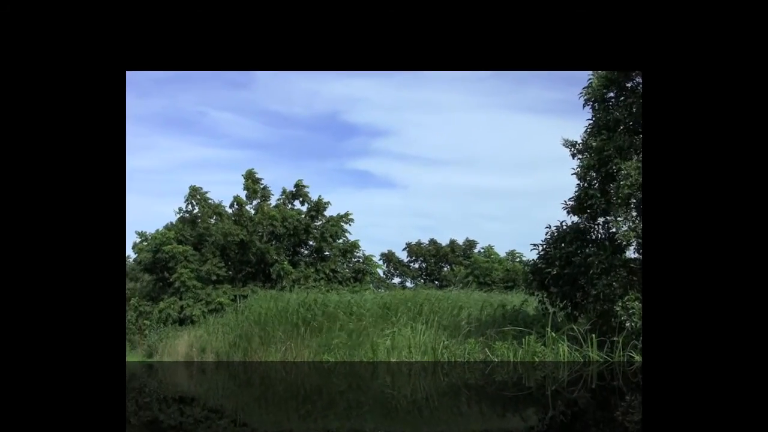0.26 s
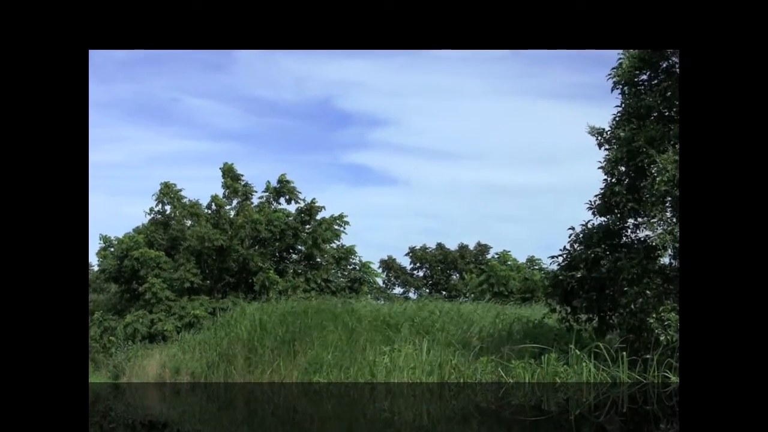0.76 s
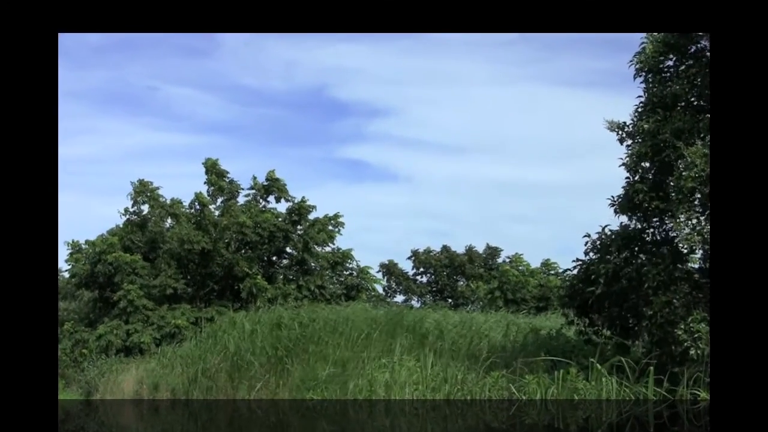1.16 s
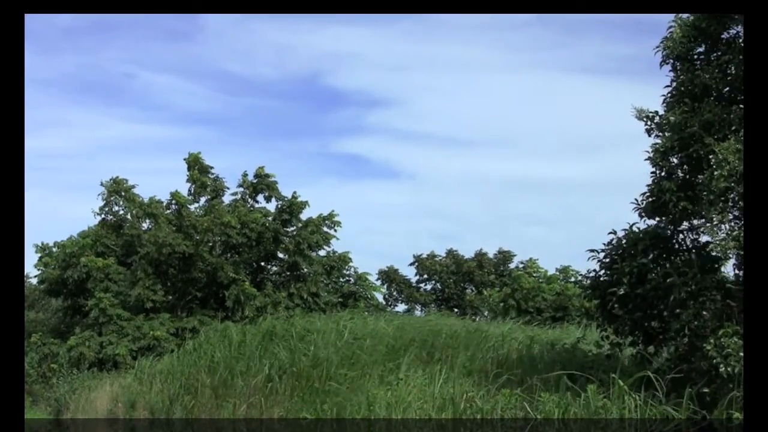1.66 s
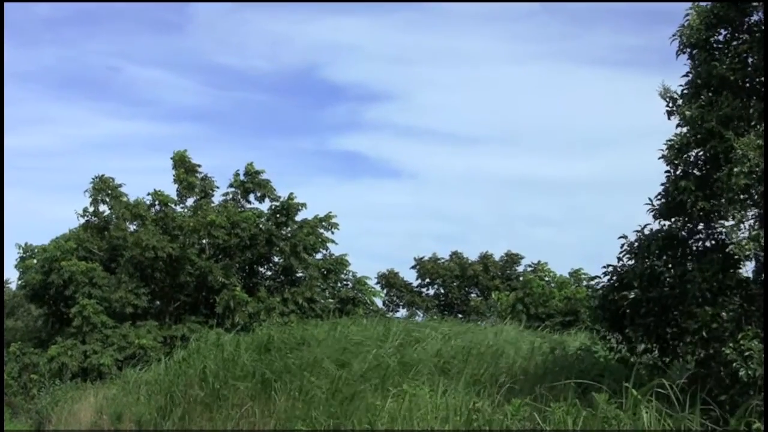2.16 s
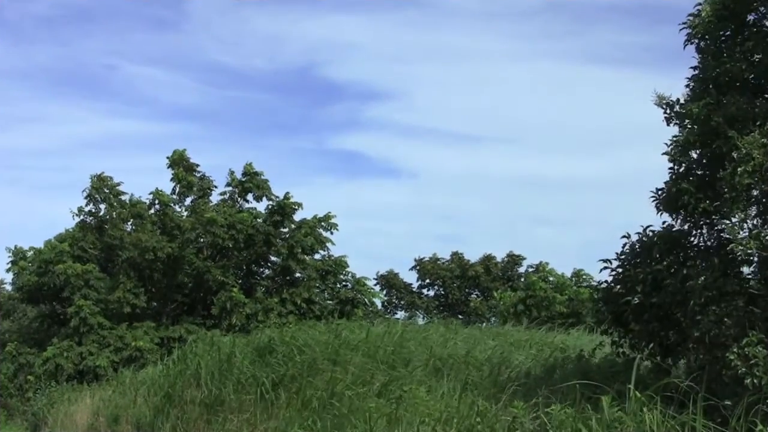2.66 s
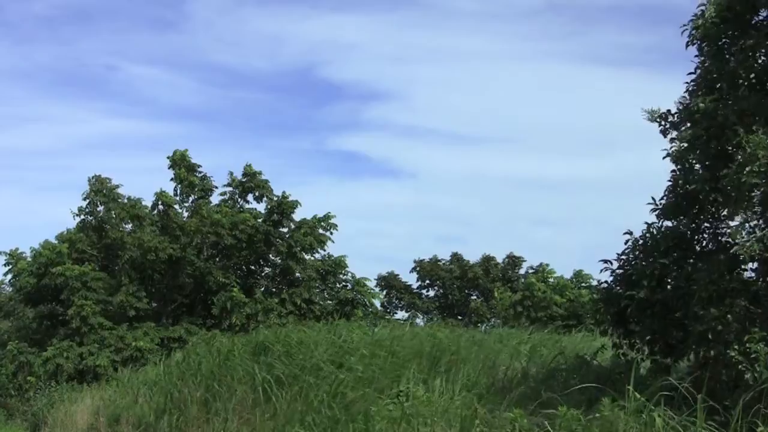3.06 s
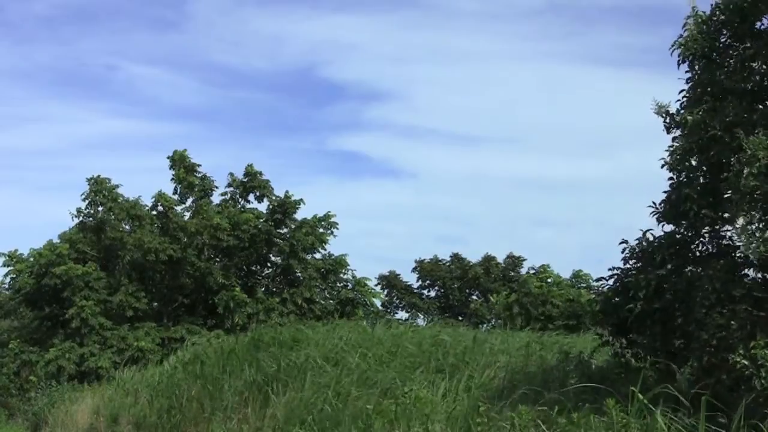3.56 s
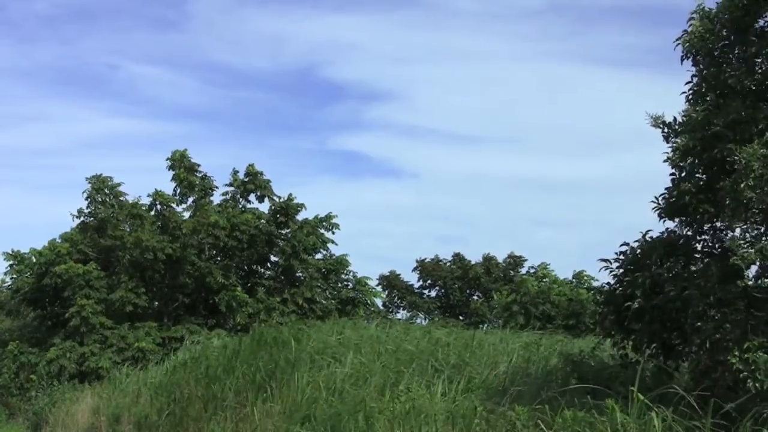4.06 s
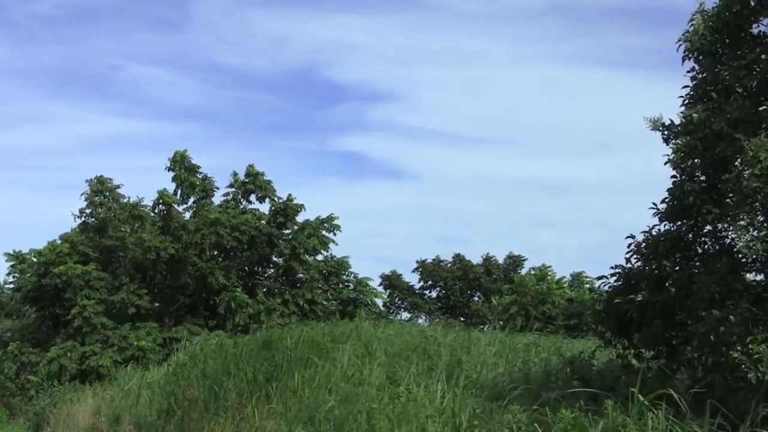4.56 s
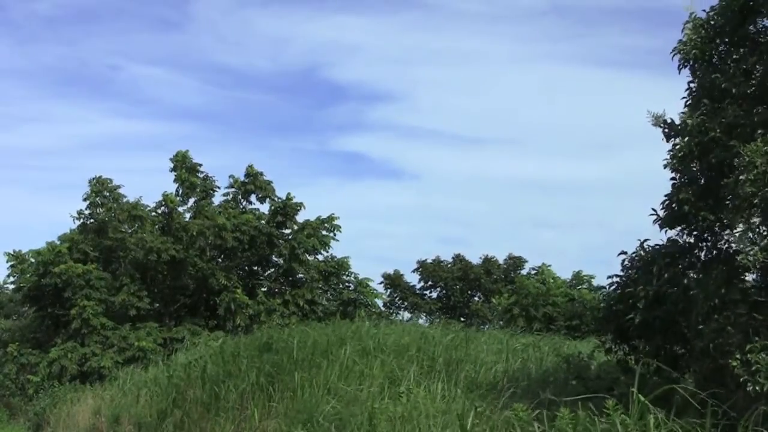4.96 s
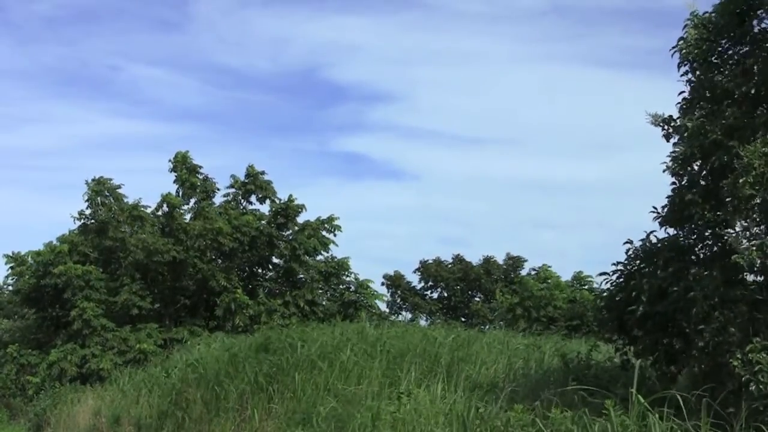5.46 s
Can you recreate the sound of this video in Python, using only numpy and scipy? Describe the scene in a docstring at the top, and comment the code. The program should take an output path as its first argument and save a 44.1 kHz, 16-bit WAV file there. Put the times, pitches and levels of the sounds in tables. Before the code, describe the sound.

Leaves and meadow grass rustle in a light wind over a faint traffic rumble, while a stalk snaps and an insect ticks briefly.

```python
"""A soft breeze beside a meadow, mono. Throughout, leaf contacts merge into a hiss, near grass
rustles and far traffic rumbles. Dry blades crack now and then; a stalk snaps twice at 0.3 s.
From 0.5 s an insect chirrs and ticks with its wings, while a far car's tyres wash by at 0.9 s.
From 1.35 s a far engine slowly gathers speed, fading out by 5 s. A second car passes at 5.3 s."""
import sys
import numpy as np
from scipy import signal
from scipy.fft import rfft, irfft
from scipy.io import wavfile

SR = 44100
rng = np.random.default_rng(int(sys.argv[2]) if len(sys.argv) > 2 else 0)


def dump_mix(stems):
    """Bounce the given channels to the path in sys.argv[1] as a 16-bit WAV at rate SR."""
    frames = np.atleast_2d(stems).T  # one column per channel
    limited = np.clip(frames, -1, 1)  # hard clip at full scale
    pcm = np.round(limited * 32767).astype(np.int16)
    wavfile.write(sys.argv[1], SR, pcm)


N = 252252
TIME_S = np.arange(N) / SR
FREQ_HZ = np.arange(N // 2 + 1) * SR / N

# breeze strength: t/s, level/dB
BREEZE = [(0.0, -46), (0.25, -45.5), (0.4, -46), (1.55, -46.5), (2.15, -46), (3.2, -44.5), (4.41, -45),
          (5.64, -44.5), (5.72, -44.5)]
# leaf hiss spectrum: f/Hz, relative level/dB
LEAF_SPECTRUM = [(170, -27.5), (260, -14.5), (400, -12.5), (720, -16.5), (1000, -8), (1200, -5.5),
                 (1500, -5.5), (2050, 0.3), (2750, 0.35), (4200, -2.5), (5500, -6.5), (7300, -11.5),
                 (10000, -14.5), (12500, -20), (14600, -27.5)]
# ripples in that spectrum: f/Hz, width/Hz, lift/dB
LEAF_RIPPLES = [(2780, 340, -1.5), (3700, 140, -1.6), (4050, 270, 0.9)]
# grass rustle spectrum: f/Hz, relative level/dB
GRASS_SPECTRUM = [(1000, -33), (2500, -4), (4200, -1), (7000, -9), (10000, -16), (14500, -28)]
# eddies stirring the grass: t/s, half length/s, lift/dB
GRASS_EDDIES = [(0.265, .07, 3), (1.764, 0.054, 6), (3.25, 0.43, 2), (3.68, 0.077, 3), (4.15, 0.037, 3),
                (5.5, 0.21, 3)]
# far cars: nearest at t/s, time to drive their distance from us/s, rumble level/dB, tyre level/dB
CAR_PASSES = [(.92, 1, -58.5, -57.5), (5.3, 1, -59, -64.5)]
# traffic rumble spectrum: f/Hz, relative level/dB
RUMBLE_SPECTRUM = [(20, -62), (35, -54), (48, -47), (60, -12), (70, -17), (84, -12), (105, -3.5),
                   (125, -0.5), (148, 1.5), (175, -2.5), (220, -10), (330, -17), (600, -30), (1500, -52)]
# tyre wash spectrum: f/Hz, relative level/dB
TYRE_SPECTRUM = [(300, -35), (520, -8.5), (640, -6.5), (780, -8.5), (930, 1), (1060, -3), (1220, 2),
                 (1450, -10), (2500, -40)]
# dry blades cracking: t/s, level/dB, f/Hz
BLADE_CRACKS = [(.0468, -41, 10750), (1.008, -47, 10100), (1.140, -41, 7400), (3.548, -39, 5330),
                (3.68, -39, 6510)]
# thick stalk's modes: f/Hz, relative level/dB, t60/s
STALK_RING = [(3400, -6, .01), (4160, -1, 0.016), (5300, 6, 0.015), (6870, -8, .012), (8660, -5, 0.014)]
# its snaps: t/s, level/dB, tilt away from main mode/(dB/octave), t60 factor, pitch factor
STALK_SNAPS = [(0.2803, -33.7, -3, .85, 1), (0.3024, -34.5, -32, 1.5, .98)]
# insect chirrs: t/s, half length/s, level/dB
INSECT_CHIRRS = [(0.518, .045, -68), (.84, 0.14, -62), (1.1, 0.056, -69)]
# insect ticks: t/s, level/dB, f/Hz
INSECT_TICKS = [(.780, -43, 8450), (.814, -41, 8400), (.821, -42, 8350), (.844, -42, 8300),
                (.869, -39, 8300), (.904, -38, 8200), (.912, -40, 8350), (.974, -41, 8150),
                (1.065, -45, 8330), (1.113, -46, 8220)]
# exhaust note: multiple of cycle rate, relative level/dB
EXHAUST_ORDERS = [(5, -15), (9, -3), (10, -0.5), (11, -16), (12, -8)]
# exhaust puff spectrum: f/Hz, relative level/dB
PUFF_SPECTRUM = [(60, -20), (90, -6), (140, 1), (190, 2), (310, -5), (520, -27)]


def undb(db):
    """Decibels to gain."""
    return 10 ** (np.asarray(db) / 20)


def unit(x):
    """Scale to rms 1."""
    return x / np.sqrt(np.mean(x ** 2))


def noise(count=N):
    """White noise, rms 1."""
    return rng.standard_normal(count)


def colour(x, spectrum, peaks=()):
    """Shape x by a spectrum plus bell-shaped peaks; rms 1."""
    hz, db = np.transpose(spectrum)
    gain_db = np.interp(np.log(FREQ_HZ + 1), np.log(hz), db)
    for centre_hz, width_hz, lift_db in peaks:
        gain_db += lift_db / (1 + (2 * (FREQ_HZ - centre_hz) / width_hz) ** 2)
    return unit(irfft(rfft(x) * undb(gain_db), N))


def ring(x, hz, width_hz):
    """Two-pole resonance."""
    return signal.lfilter(*signal.iirpeak(hz, hz / width_hz, fs=SR), x)


def walk(rate_hz):
    """Smooth random drift; rms 1."""
    return unit(irfft(rfft(noise()) / (1 + (FREQ_HZ / rate_hz) ** 4), N))


def swell(at_s, half_s):
    """Gaussian rise and fall; peak 1."""
    return np.exp(-((TIME_S - at_s) / half_s) ** 2)


def flutter(x, rate_hz, depth_db, count=9):
    """Overlapping bands waver independently, as separate branches do; rms 1."""
    spectrum = rfft(x)
    band_index = np.interp(np.log(FREQ_HZ + 1), np.log([700, 14000]), [0, count - 1])
    bands = (irfft(spectrum * np.maximum(1 - abs(band_index - k), 0), N) for k in range(count))
    return unit(sum(band * undb(depth_db * walk(rate_hz)) for band in bands))


def contacts(per_s, spread_db):
    """Random tiny impacts, most weak, a few stronger."""
    hit = rng.random(N) < per_s / SR
    size_db = spread_db * np.minimum(rng.exponential(size=N), 5)
    return hit * rng.choice([-1, 1], N) * undb(size_db)


def knock(at_s, db, modes, crack_db=-8, rise_s=0.00026, crack_decay_s=0.0026):
    """One dry contact: a brief crack plus ringing modes (f/Hz, level/dB, t60/s)."""
    age_s = TIME_S[:SR // 10]
    body = sum(undb(mode_db - 60 * age_s / t60_s) * np.sin(2 * np.pi * hz * age_s)
               for hz, mode_db, t60_s in modes)
    crack = unit(ring(ring(noise(len(age_s)), 6500, 5000), 6500, 6000))
    crack *= undb(crack_db) * np.exp(-age_s / crack_decay_s)
    sound = undb(db) * (body + crack) * (1 - np.exp(-age_s / rise_s))
    return np.pad(sound, (int(at_s * SR), N))[:N]


def leaves(breeze_db, gust_db):
    """Far leaf contacts merge into a hiss; gusts make them strike harder and brighter."""
    hiss = colour(noise(), LEAF_SPECTRUM, LEAF_RIPPLES)
    hiss = flutter(hiss, rate_hz=16, depth_db=0.67)
    brightening = ring(hiss, hz=4400, width_hz=3600) * (undb(0.5 * gust_db) - 1)
    return (hiss + brightening) * undb(breeze_db + 0.57 * gust_db)


def whistle(breeze_db, gust_db, centre_hz=3138, width_hz=510, relative_db=-10):
    """A narrow band of hiss trembles, drifts in pitch, follows the breeze and lifts at the end."""
    pitch_hz = centre_hz * (1 + 0.004 * walk(1))
    phase = 2 * np.pi * np.cumsum(pitch_hz) / SR
    band = walk(width_hz / 2) * np.cos(phase) + walk(width_hz / 2) * np.sin(phase)
    tremble_db = walk(19)
    lift_db = 2 * swell(at_s=6, half_s=0.45)
    return unit(band * undb(tremble_db)) * undb(breeze_db + gust_db + relative_db + lift_db)


def grass(breeze_db, gust_db, relative_db=-11.5):
    """Near blades brush in flurries; stronger wind makes more of them touch."""
    stir_db = 1.4 * gust_db + sum(db * swell(at_s, half_s) for at_s, half_s, db in GRASS_EDDIES)
    flurry = undb(stir_db + 0.3 * walk(9.9))
    rustle = colour(contacts(per_s=4500 * flurry, spread_db=1), GRASS_SPECTRUM)
    return flutter(rustle, rate_hz=28, depth_db=2.1) * undb(breeze_db + stir_db + relative_db)


def cars(wander_db=0.5):
    """Rumble and tyre wash fall with distance; moving air makes the rumble waver."""
    sound = np.zeros(N)
    for nearest_s, width_s, rumble_db, tyre_db in CAR_PASSES:
        rumble = colour(noise(), RUMBLE_SPECTRUM) * undb(rumble_db + wander_db * walk(2.2))
        tyres = colour(noise(), TYRE_SPECTRUM) * undb(tyre_db)
        distance_ratio = np.hypot(1, (TIME_S - nearest_s) / width_s)
        sound += (rumble + tyres) / distance_ratio
    return sound


def road_drone(start_db=-70.5, rise_db_per_s=0.72):
    """A hollow drone from the road, slowly nearing."""
    drone = unit(ring(ring(noise(), 472, 76), 477, 105))
    return drone * undb(start_db + rise_db_per_s * TIME_S)


def dry_blades(t60_s=0.012):
    """Thin blades crack, each ringing at one pitch."""
    return sum(knock(at_s, db, [(hz, 0, t60_s)]) for at_s, db, hz in BLADE_CRACKS)


def stalk():
    """A thick stalk snaps, then gives again with a purer, lower, longer ring."""
    main_hz = STALK_RING[1][0]
    sound = np.zeros(N)
    for at_s, db, tilt_db_per_oct, t60_factor, pitch_factor in STALK_SNAPS:
        modes = []
        for hz, mode_db, t60_s in STALK_RING:
            octaves = abs(np.log2(hz / main_hz))
            modes.append((hz * pitch_factor, mode_db + tilt_db_per_oct * octaves, t60_s * t60_factor))
        sound += knock(at_s, db, modes, crack_db=-6.5)
    return sound


def insect(upper_hz=11850, t60_s=0.012):
    """Wing teeth click into a narrow resonance and a weaker upper one; sharp ticks stand out."""
    clicks = contacts(per_s=450, spread_db=2)
    main = unit(ring(ring(clicks, 7950, 450), 8400, 550))
    upper = undb(-9) * unit(ring(clicks, upper_hz, 300))
    envelope = sum(undb(db) * swell(at_s, half_s) for at_s, half_s, db in INSECT_CHIRRS)
    ticks = sum(knock(at_s, db, [(hz, 0, t60_s), (upper_hz, -12, t60_s)])
                for at_s, db, hz in INSECT_TICKS)
    return (main + upper) * envelope + ticks


def engine(start_s=1.35, attack_s=1.22, hold_s=1.7, release_s=0.7):
    """It speeds up and draws away; only low exhaust orders and a dull puff per cycle carry this far."""
    start_hz, rise_hz_per_s = 12.54, 0.84
    base_db, fade_db_per_s, puff_db = -57, 0.66, -9.5
    age_s = TIME_S - start_s
    throttle = np.interp(age_s, np.cumsum([0, attack_s, hold_s, release_s]), [0, 1, 1, 0])
    cycle_hz = (start_hz + rise_hz_per_s * age_s) * (1 + 0.0026 * walk(3.6))
    phase = 2 * np.pi * np.cumsum(cycle_hz) / SR
    note = sum(undb(db + 0.98 * walk(3.5)) * np.cos(order * phase) for order, db in EXHAUST_ORDERS)
    puffs = colour(noise(), PUFF_SPECTRUM) * (1 + np.cos(phase))
    exhaust = unit(note) + undb(puff_db) * unit(puffs)
    return exhaust * throttle * undb(base_db - fade_db_per_s * age_s)


def scene():
    """All sources summed, the same in both channels."""
    wind_db = np.interp(TIME_S, *np.transpose(BREEZE))
    breeze_db = wind_db.mean()
    gust_db = wind_db - breeze_db
    mono = leaves(breeze_db, gust_db) + whistle(breeze_db, gust_db) + grass(breeze_db, gust_db)
    mono += cars() + road_drone() + dry_blades() + stalk() + insect() + engine()
    return np.array([mono, mono])


def record(dry):
    """Steep low-pass on the top treble."""
    cutoff_hz = 14550
    return signal.sosfilt(signal.ellip(10, 0.1, 70, cutoff_hz, fs=SR, output="sos"), dry)


dry = scene()
out = record(dry)
dump_mix(out)
```